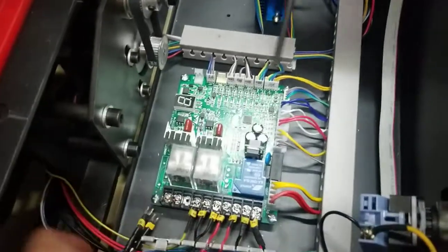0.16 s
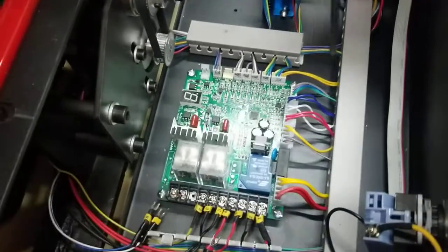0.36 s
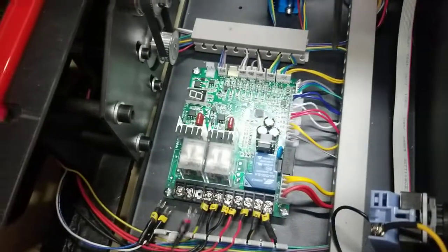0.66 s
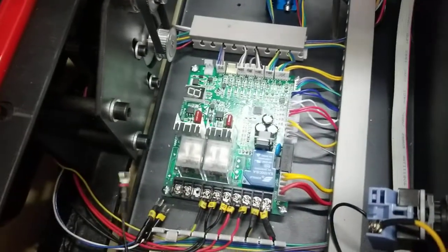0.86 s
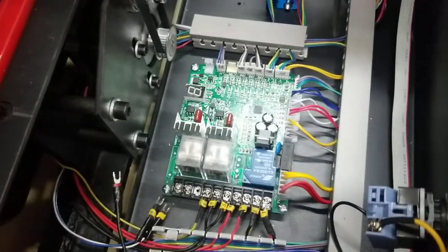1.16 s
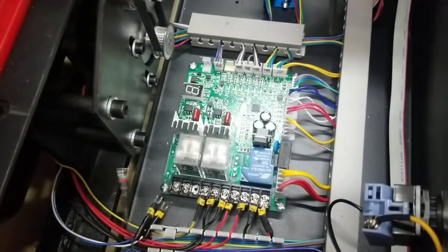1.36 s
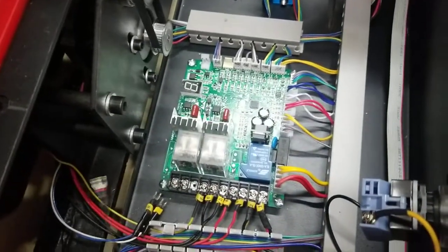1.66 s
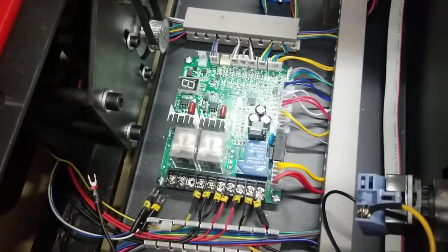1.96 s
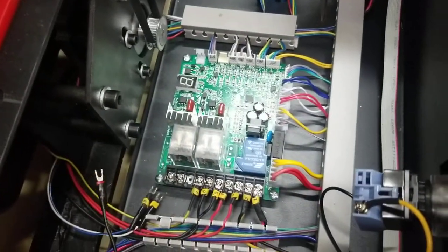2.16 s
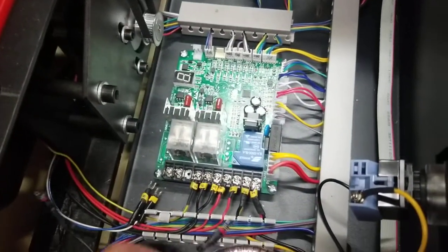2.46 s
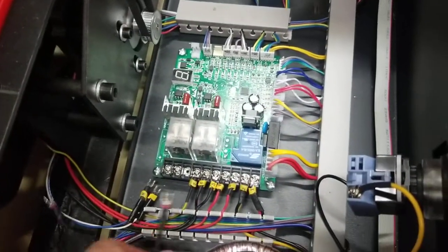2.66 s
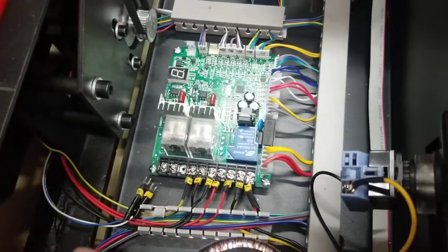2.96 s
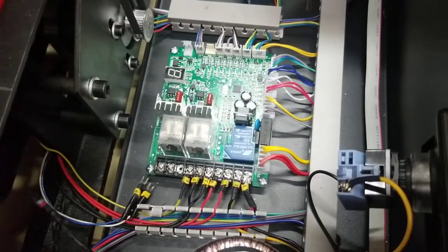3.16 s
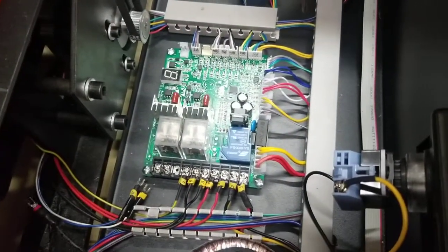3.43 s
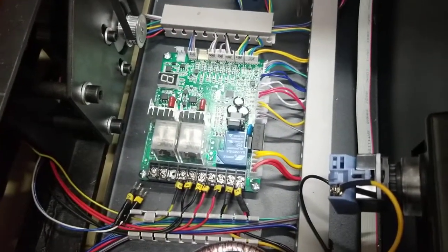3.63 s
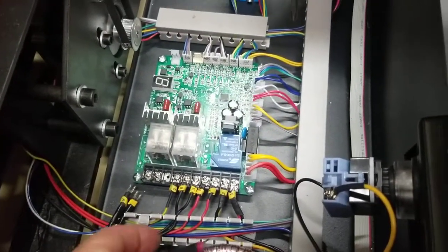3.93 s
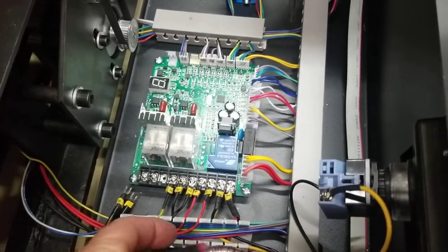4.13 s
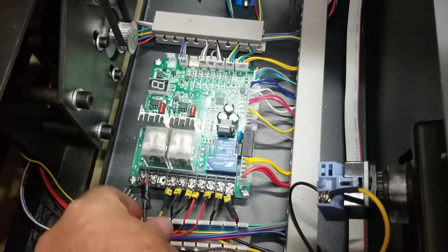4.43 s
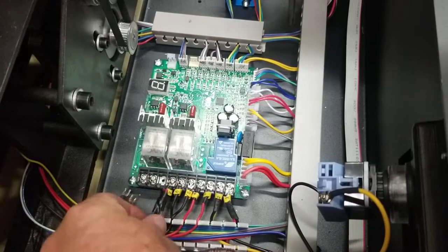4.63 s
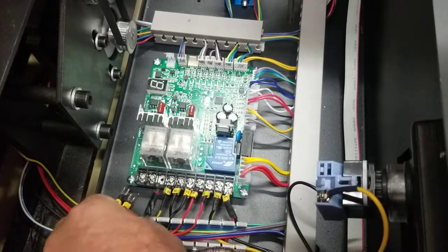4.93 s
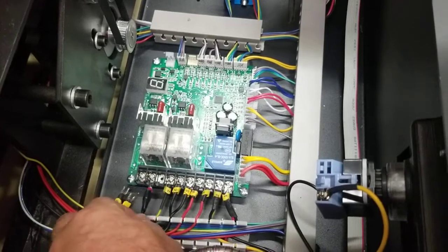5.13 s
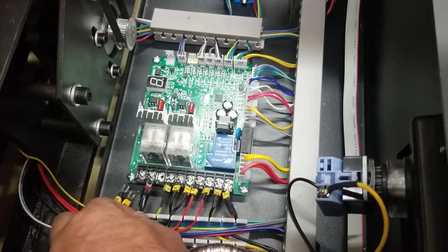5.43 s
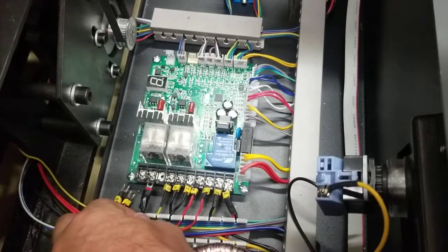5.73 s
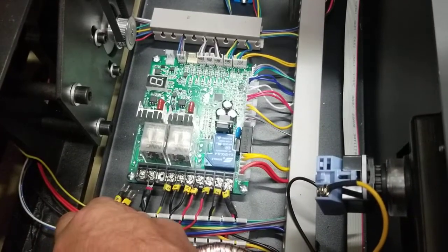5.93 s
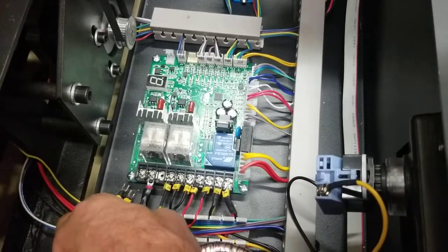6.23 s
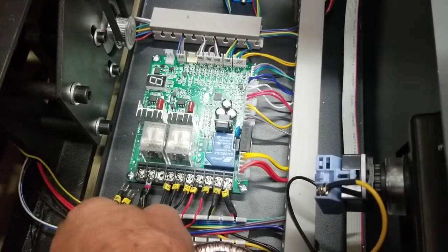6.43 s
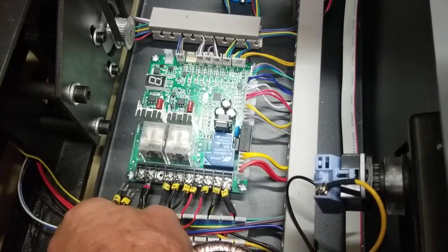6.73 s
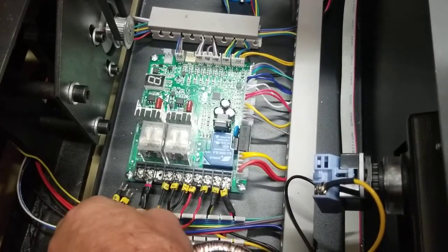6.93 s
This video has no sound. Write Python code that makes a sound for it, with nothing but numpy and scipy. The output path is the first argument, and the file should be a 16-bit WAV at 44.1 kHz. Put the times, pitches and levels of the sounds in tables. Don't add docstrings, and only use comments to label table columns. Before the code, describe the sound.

Wires and crimped terminals are handled in a steel cabinet, with hollow knocks, tiny metallic ticks and insulation rubs over a low distant hum.

```python
import sys
import numpy as np
from scipy import signal
from scipy.fft import rfft, irfft, next_fast_len
from scipy.io import wavfile
from scipy.ndimage import uniform_filter1d

SR = 44100
rng = np.random.default_rng(int(sys.argv[2]) if len(sys.argv) > 2 else 0)


def rack_gain(trim_db):
    fader = np.asarray(trim_db, float)
    return 10 ** (fader / 20)


def transcribe(signal):
    frames = np.atleast_2d(signal).T
    limited = np.clip(frames, -1, 1)
    pcm = np.round(limited * 32767).astype(np.int16)
    wavfile.write(sys.argv[1], SR, pcm)


N = 312667

# start in seconds, peak in dB, sharpness in dB,
# fall of the rattle in dB per 10 ms.
FLOOR_KNOCKS = [(0.945, -39.5, -47, 10), (2.826, -34.5, -12, 15), (2.854, -31.5, -27, 10.5),
                (2.967, -27.5, -31, 7), (4.575, -48, -28.5, 6), (5.032, -44.5, -48, 10),
                (6.461, -46.5, -3, 1), (6.539, -51, -3.5, 1.5), (6.876, -58.5, 5, 4), (6.965, -50, -45, 24),
                (7.036, -35.5, -31, 7.5)]
WALL_KNOCKS = [(0.661, -25.5, -14, -3), (0.684, -26.5, -26, 8), (1.108, -36, -25.5, 10),
               (2.632, -34.5, -29, 7), (2.664, -24, -18, 8), (2.675, -25, -18, 22),
               (2.712, -20.5, -12.5, 12), (2.223, -52, -23, 1), (3.519, -38.5, -20, 0), (3.55, -34, -28, 6),
               (3.595, -26.5, -17.5, 13), (3.634, -23.5, -13, 9.5), (3.785, -35.5, -23, 11),
               (4.202, -44, -23, 15), (4.434, -37, -22, 10), (4.452, -31, -19.5, 11),
               (4.461, -31.5, -22.5, 10.5), (4.53, -30.5, -17.5, 9.5), (5.592, -53.5, -6.5, -1),
               (6.166, -35.5, -35, 13.5)]
RAIL_KNOCKS = [(0.546, -32, -40, 4), (0.566, -25, -50, 6.5), (1.223, -45, -2, -3), (1.426, -52, -44, -3),
               (1.454, -34.5, -34, 18), (1.598, -21.5, -16.5, 21), (2.262, -20, -16, 16),
               (2.8905, -12.5, -16, 19.5), (2.903, -18, -15, 10.5), (3.022, -11, -1, 20),
               (3.092, -18.5, -3, 13.5), (3.104, -26, -11.5, 11.5), (3.669, -25.5, -19.5, 12.5),
               (4.421, -46, -23, 10.5)]
# start in seconds,
# peak in dB, top end in dB, fall in dB per 10 ms.
SCREW_TICKS = [(0.304, -44.5, -42, 15), (0.4828, -49, -25, 16), (1.855, -52, -25, 3), (0.664, -45, -8, 1),
               (1.5995, -39, -21, 9.5), (2.2626, -35.5, -31, 6), (2.6549, -49, -30, 13),
               (2.7054, -42.5, -16, 6), (2.753, -38, -27, 4), (2.7683, -35, -15.5, 9),
               (2.8091, -33.5, -19.5, 7), (2.825, -46, -4, 15.5), (2.8515, -34.5, -15.5, 12),
               (2.8905, -29.5, -6, 9), (3.025, -24.5, -23, 5), (3.093, -36.5, -22, 6.5),
               (3.594, -45, -30, 11.5), (3.6358, -38, -15.5, 12.5), (4.2353, -54.5, -27, 19.5),
               (6.5161, -55, -4.5, -3.5), (6.541, -43.5, -6, 14.5), (6.8712, -41.5, -18, 7.5),
               (7.0069, -52.5, -17, 4.5), (7.0413, -42.5, -16.5, 4)]
FORK_TICKS = [(0.123, -42, -25, 14), (0.218, -40.5, -10.5, 18), (0.501, -49, -29, 15),
              (1.0624, -61, -23, 16), (1.1, -50, -22, -1), (1.1453, -56, -14, 22), (1.2247, -27, -24.5, 12),
              (2.6725, -31.5, -14, 10), (2.873, -35, -11, 43), (4.432, -48, -20, 9),
              (3.812, -36, -23.5, 17)]
STRAND_TICKS = [(0.578, -39, -18, 22), (0.978, -60, -24, 8), (1.4518, -31, -11, 13),
                (1.534, -47.5, -5.5, 10), (3.703, -49, -21.5, 21.5), (3.725, -49, -18, 22),
                (3.746, -52, -24, 22), (3.759, -52, -21, 22), (6.409, -56.5, -15.5, 3),
                (6.4462, -33.5, -17, 7.5)]
# start in seconds, peak in dB, left-right balance in dB.
SNAP = [
    (2.133, -39.5, 40),
]
# time in seconds, level in dB.
SCRAPE = [
    (.298, -54),
    (.305, -45),
    (.318, -59),
    (.332, -50.5),
    (.342, -49.5),
    (.351, -49.5),
    (.37, -63),
    (.4, -84),
]
# pitch in Hz, width in Hz, level in dB.
LUG = [(2400, 220, 3.5), (3920, 190, 12.5), (5940, 350, 8.5), (9450, 280, -23), (11900, 1100, -14)]
# start in seconds, length in seconds, level in dB,
# contact pitch in Hz.
SLIDES = [
    (4.237, 0.21, -76.5, 5700),
    (6.235, .16, -79, 5670),
]
# full contact in seconds, hold in seconds, panel drive in dB,
# surface fizz in dB, brightness in dB.
DRAGS = [(0.0, 0.0014, -38, -54, 5), (0.001, .28, -54.5, -50.5, 9), (0.345, 0.026, -55, -60, -28),
         (0.507, 0.014, -49.5, -86, -2), (0.566, 0.027, -30, -56.5, -9.5), (0.678, 0.13, -30, -56, -5.5),
         (1.449, .09, -41.5, -71, -14), (2.22, 0.051, -40, -76, -36), (2.323, 0.17, -38.5, -71.5, -19),
         (2.712, .06, -35.5, -68, -2), (2.833, 0.087, -37, -73.5, -34), (2.923, .04, -30, -61, -18),
         (2.977, 0.036, -29.5, -60.5, -6.5), (3.11, 0.032, -35, -74.5, -15), (3.554, 0.054, -33.5, -63, -7),
         (3.66, .14, -35, -62.5, -11), (4.454, .06, -36, -67, -11), (4.557, 0.077, -35, -68.5, -13)]
# time in seconds, pressure in dB, sliding in dB.
STIR = [(0, -66.5, -84.5), (.45, -70.5, -73), (.94, -60.5, -95), (1.07, -55, -88), (1.3, -73, -84),
        (1.65, -54, -79), (2.07, -81, -100), (2.6, -52, -84.5), (3.2, -50.5, -76.5), (3.44, -61.5, -81),
        (3.96, -78, -99), (4.3, -72, -84), (4.8, -76, -98.5), (5.38, -74, -93.5), (5.6, -73, -89),
        (6.2, -66, -87), (6.65, -79.5, -83.5), (7.09, -65.5, -88)]
# time in seconds, left-right balance in dB.
HANDS = [(0, 6), (1.3, 10), (1.6, 8), (2.2, 7), (4.3, 11), (4.6, 5), (7.09, 8.5)]
# pitch in Hz, level in dB, T60 in seconds.
PANEL = [(130.2, -8.5, 0.28), (188, -9.5, 0.34), (211, 2, 0.33), (253.7, -5.5, 0.21), (318, 6.5, 0.33),
         (385.8, -1.5, 0.16), (439.7, 1, 0.2), (465.4, -2.5, 0.4), (591, -8, 0.12), (632, 2.5, 0.45),
         (704.5, -7.5, 0.18), (834.4, -8, 0.17), (976, 1.5, 0.12), (1060, -6, 0.09), (1204, -6, 0.21),
         (1373, -10.5, 0.032), (1600, -13.5, 0.43), (1960, -15, 0.25)]
# frequency in Hz, level in dB per Hz.
BODY = [(90, -40.5), (150, -3), (315, -9.5), (460, -6), (630, -2), (1000, -9.5), (1400, -7.5), (2200, -17),
        (4000, -26.5), (6000, -63)]
# frequency in Hz, level in dB per Hz.
FIZZ = [(880, -27), (1500, -16.5), (2240, -10.5), (2570, -14.5), (3500, -16), (4190, -16.5), (7480, -20),
        (8690, -37), (13100, -31.5), (16300, -59)]
# frequency in Hz, T60 in seconds.
ROOM = [(200, 0.25), (1000, 0.16), (3000, 0.097), (8000, 0.24)]
# time in seconds, level in dB.
HUM = [(0, -42), (1, -43), (2, -43), (2.8, -38.5), (3.5, -38.5), (4.2, -42.5), (5, -43), (5.6, -40.5),
       (6.2, -37), (7.09, -35)]
# frequency in Hz, level in dB per Hz.
RUMBLE = [(20, -24.5), (36, -23.5), (46, -6.5), (53, -4), (60, -2), (72, -15), (98, -3), (112, -11.5),
          (135, -13), (150, -18), (200, -18), (350, -35), (520, -46), (900, -100)]
# frequency in Hz, level in dB per Hz.
HISS = [(180, -30.5), (300, 0), (426, -4), (566, -22), (626, -13.5), (904, -52.5), (1220, -23.5),
        (1600, -31.5), (1740, -28), (1890, -32), (7600, -38), (8300, -43), (10000, -41.5), (11500, -33),
        (15200, -26.5), (16300, -49)]
# frequency in Hz, likeness from 0 to 1.
SAME = [(60, 0.87), (180, 0.63), (550, 1), (1650, 0.21), (4970, 0.25), (15000, 0.08)]

FLOOR_HZ, WALL_HZ, RAIL_HZ = 420, 686, 1046
SCREW_HZ, FORK_HZ, STRAND_HZ = 4100, 6140, 7500
SCREW_WIDTH, FORK_WIDTH, STRAND_WIDTH = 0.48, 0.15, 0.312
LUGS_LEFT_DB = 3
GRIP_DB_PER_S, SAG_DB_PER_S, LIFT_DB_PER_S = 351.5, 55.5, 190.5


def read(points, hz):
    f, value = np.transpose(points)
    return np.interp(np.log(hz + 1), np.log(f + 1), value)


def curves(rows):
    s, *columns = np.transpose(rows)
    return [np.interp(np.arange(N) / SR, s, c) for c in columns]


def evened(x):
    return x / np.sqrt(np.mean(x ** 2) + 1e-20)


def coloured(x, gain):
    n = next_fast_len(x.shape[-1])
    spectrum = rfft(x, n) * gain(np.fft.rfftfreq(n, 1 / SR))
    return irfft(spectrum, n)[..., :x.shape[-1]]


def modes(hz, table, gains):
    total = 0
    for (f, db, t60), g in zip(table, gains):
        ring_s = max(t60, .0005) * np.pi / np.log(1000)
        total = total + g * rack_gain(db) / (1 + 2j * (hz - f) * ring_s)
    return total


def pair(n, same):
    a, b = rng.standard_normal((2, n))
    same = np.clip(same, 0, 1)
    return np.array([a, same * a + np.sqrt(1 - same ** 2) * b])


def lumps(width):
    once = uniform_filter1d(rng.standard_normal(N), size=width)
    return evened(uniform_filter1d(once, size=width))


def placed(x, pan_db):
    lag_samples = 12
    pan_db = np.clip(pan_db, -8, 16)
    near = np.array([x[0] * rack_gain(pan_db / 2), np.roll(x[1], lag_samples) * rack_gain(-pan_db / 2)])
    low = lambda hz: 1 / (1 + (hz / 400.) ** 4)
    return near - coloured(np.outer([.5, -.5], near[0] - near[1]), low)


def faded(x):
    n = np.arange(x.shape[1])
    return x * np.clip(n / 20, 0, 1) * np.clip(4 - 4 * n / len(n), 0, 1) ** 2


def add(mix, s, sound):
    part = mix[:, round(s * SR):][:, :sound.shape[1]]
    part += sound[:, :part.shape[1]]


def panel(push, centre_hz, slope_db, crowd_db, t60):
    def near(hz):
        fall_db = -slope_db * np.log2((hz + 1) / centre_hz) ** 2
        return rack_gain(np.maximum(fall_db, -18. - 30 * (hz > centre_hz)))

    gains = rng.choice([-1., 1.], len(PANEL)) * rack_gain(1.8 * rng.standard_normal((2, len(PANEL))))
    clear = np.array([coloured(push[c], lambda hz: near(hz) * modes(hz, PANEL, gains[c])) for c in range(2)])
    crowd = pair(8000, 0.21) * rack_gain(-60 * np.arange(8000) / SR / t60)
    lines = rfft(crowd)
    lines = lines / uniform_filter1d(abs(lines), size=25)
    crowd = irfft(lines)[:, :4000] * np.hanning(8000)[4000:]
    crowd = signal.oaconvolve(push, crowd, axes=1)[:, :push.shape[1]]
    crowd = coloured(crowd, lambda hz: near(hz) * rack_gain(read(BODY, hz)))
    return evened(clear) + rack_gain(crowd_db) * evened(crowd)


def knock(peak_db, centre_hz, sharp_db, fall_db, pan_db):
    t = np.arange(16000) / SR
    dull_db = np.clip(sharp_db, -55, 0)
    rise_s = 0.0014 * rack_gain(-.3 * np.clip(sharp_db, -45, 0))
    rattle = rack_gain(-100 * np.clip(fall_db, 3, 60) * t) + 2.3 * rack_gain(-60 * t / 0.025)
    strike = 4.1 * np.sin(2 * np.pi * centre_hz * t) * np.exp(-t / 0.00084) * rack_gain(0.15 * dull_db)
    blow = pair(len(t), 0.7) * (1 - np.exp(-t / rise_s)) * rattle + strike
    ring = panel(blow, centre_hz, -0.3 - 0.11 * dull_db, 0.32, 0.16)
    crack_modes = [(2200, 0.0, 0.0047), (3130, -15.5, 0.001)]  # Hz, dB, T60 s
    crack = coloured(blow, lambda hz: modes(hz, crack_modes, (1, -1)))
    both = ring / abs(ring).max() + rack_gain(sharp_db - 1.5) * crack / abs(crack).max()
    return faded(placed(rack_gain(peak_db + 3.5) * both, pan_db))


def tick(peak_db, centre_hz, width, top_db, fall_db, pan_db):
    t = np.arange(6000) / SR
    shape = rack_gain(-100 * np.clip(fall_db, 3, 90) * t) + 0.43 * rack_gain(-60 * t / .002)
    burst = pair(len(t), 0.071) * shape * (1 - np.exp(-t / 0.00074))

    def lug(hz):
        ring = 1 / (1 + 1j * (hz - centre_hz) / (width * centre_hz))
        return ring * hz / (hz + 5100.0) / (1 + (hz / 8600.0) ** 8)

    def top(hz):
        off = (hz - 12800) / 2600
        return 1 / (1 + (1j * off) ** 2 + 1.4j * off)

    low, high = coloured(burst, lug), coloured(burst, top)
    both = low / abs(low).max() + rack_gain(top_db + 10.0) * high / abs(high).max()
    return faded(placed(rack_gain(peak_db - 6.0) * both, pan_db))


def snap(peak_db, pan_db):
    u = np.arange(400) / 3.7
    return placed(rack_gain(peak_db + 1.5) * np.tile((1 - u) * np.exp(-u), (2, 1)), pan_db)


def scrape():
    start_s, end_s = SCRAPE[0][0], SCRAPE[-1][0]
    t = np.arange(round((end_s - start_s) * SR)) / SR + start_s
    ring = lambda hz: sum(rack_gain(db) / (1 + 2j * (hz - f) / width) for f, width, db in LUG)
    sound = evened(coloured(pair(len(t), 0.32), ring)) * rack_gain(np.interp(t, *np.transpose(SCRAPE)))
    return placed(sound * signal.windows.tukey(len(t), .05), 8.7)


def slide(length_s, level_db, contact_hz):
    width_hz = 2400
    t = np.arange(round(length_s * SR)) / SR
    hiss = coloured(pair(len(t), 0.35), lambda hz: 1 / (1 + (2 * (hz - contact_hz) / width_hz) ** 2))
    return placed(rack_gain(level_db) * evened(hiss) * signal.windows.tukey(len(t), .5), 10.4)


def contact():
    fizz_grip, fizz_lift, dulling = 1.7, 1.4, 1
    stir_bright_db = -10
    pressure_db, sliding_db = curves(STIR)
    power = rack_gain(2 * np.array([pressure_db, sliding_db, pressure_db + stir_bright_db]))
    for s, hold_s, drive_db, fizz_db, bright_db in DRAGS:
        first = max(round(s * SR) - 8000, 0)
        t = np.arange(first, first + 36000) / SR - s
        edge_db = -GRIP_DB_PER_S * np.maximum(-t, 0) - LIFT_DB_PER_S * np.maximum(t - hold_s, 0)
        sag_db = -SAG_DB_PER_S * np.clip(t, 0, max(hold_s, 0))
        levels_db = np.array([
            drive_db + edge_db,
            fizz_db + np.where(t < 0, fizz_grip, fizz_lift) * edge_db,
            drive_db + bright_db + (1 + dulling) * edge_db])
        add(power, first / SR, rack_gain(2 * (levels_db + sag_db)))
    drive_db, fizz_db, upper_db = 10 * np.log10(power)
    return drive_db, fizz_db, upper_db - drive_db


def rubbing():
    drive_db, fizz_db, bright_db = contact()
    slips = rack_gain(3.0 * np.minimum(rng.exponential(1, N), 3)) * (rng.random(N) < 900 / SR)
    grain = 0.86 + evened(signal.lfilter([1], [1, -.985], slips))
    push = pair(N, 1.0) * grain * rack_gain(drive_db)
    ring = panel(push, 560.0, 1.1, 1.67, 0.03) * np.sqrt(np.mean(push ** 2)) * rack_gain(-6.0)
    upper = coloured(ring, lambda hz: 1 - 1 / (1 + (hz / 800) ** 4))
    ring = coloured(ring, lambda hz: 1 / (1 + (89.0 / (hz + 1)) ** 2))
    ring = ring + upper * (rack_gain(bright_db - 1.0) - 1)
    fizz = coloured(pair(N, 0.1) * np.sqrt(grain), lambda hz: rack_gain(read(FIZZ, hz)))
    fizz = evened(fizz) * rack_gain(fizz_db + 2.5)
    coarse = coloured(fizz, lambda hz: 1 / (1 + (hz / 3500.) ** 4))
    coarse_db = 2 + 0.12 * (drive_db - fizz_db - 25.0)
    fizz = fizz + coarse * (rack_gain(coarse_db) - 1)
    return placed(ring, 6.6) + placed(fizz, 9.8)


def room(x):
    taps = np.zeros((2, SR // 2))
    at = np.arange(200, SR // 2 - 20, 20) + rng.integers(0, 20, (2, (SR // 2 - 201) // 20))
    np.put_along_axis(taps, at, rng.choice([-1., 1.], at.shape), 1)
    hz, t, z = signal.stft(taps, SR, nperseg=256)
    decay = rack_gain(-60 * t / read(ROOM, hz)[:, None])
    tail = signal.istft(z * decay, SR, nperseg=256)[1]
    return signal.fftconvolve(x, tail / np.linalg.norm(tail[0]), axes=1)[:, :N]


def hum():
    turn = 2 * np.pi * np.cumsum(116.3 + 0.69 * lumps(3000)) / SR
    tone = np.array([np.sin(turn + lag) + 0.025 * np.sin(2 * turn) for lag in (0, .15)])
    level_db = curves(HUM)[0] - 2.5 + 1.5 * lumps(1500) + np.array([[.7], [-.7]])
    return np.sqrt(2) * tone * rack_gain(level_db)


def background():
    rumble_db, follows_hum, hiss_db = -54.5, 0.84, -67
    shake_s, shake_length_s, shake_db = 2.9, 0.27, 6.5
    rumble = evened(coloured(pair(N, 0.96), lambda hz: rack_gain(read(RUMBLE, hz))))
    a, b = rng.standard_normal((2, N))
    same = lambda hz: np.clip(read(SAME, hz), 0, 1)
    other = lambda hz: np.sqrt(1 - same(hz) ** 2)
    both = np.array([a, coloured(a, same) + coloured(b, other)])
    hiss = evened(coloured(both, lambda hz: rack_gain(read(HISS, hz))))
    hum_db = curves(HUM)[0]
    shake = np.exp(-((np.arange(N) / SR - shake_s) / shake_length_s) ** 2)
    swell_db = follows_hum * (hum_db - hum_db.min()) + shake_db * shake
    return rumble * rack_gain(rumble_db + swell_db + 4.0) + hiss * rack_gain(hiss_db + 0.54 * lumps(2000))


def scene():
    knocks, ticks = np.zeros((2, 2, N))
    side_db = lambda s: np.interp(s, *np.transpose(HANDS))
    for hz, rows in [(FLOOR_HZ, FLOOR_KNOCKS), (WALL_HZ, WALL_KNOCKS), (RAIL_HZ, RAIL_KNOCKS)]:
        for s, peak_db, sharp_db, fall_db in rows:
            add(knocks, s, knock(peak_db, hz, sharp_db, fall_db, side_db(s)))
    parts = [(SCREW_HZ, SCREW_WIDTH, SCREW_TICKS),
             (FORK_HZ, FORK_WIDTH, FORK_TICKS),
             (STRAND_HZ, STRAND_WIDTH, STRAND_TICKS)]
    for hz, width, rows in parts:
        for s, peak_db, top_db, fall_db in rows:
            add(ticks, s, tick(peak_db, hz, width, top_db, fall_db, side_db(s) + LUGS_LEFT_DB))
    add(ticks, SCRAPE[0][0], scrape())
    for s, length_s, level_db, contact_hz in SLIDES:
        add(ticks, s, slide(length_s, level_db, contact_hz))
    echoes = room(rack_gain(-5.5) * knocks + rack_gain(-14.0) * ticks)
    for s, peak_db, pan_db in SNAP:
        add(ticks, s, snap(peak_db, pan_db))
    return knocks + ticks + echoes + rubbing() + hum() + background()


def roll_off(x):
    return signal.sosfilt(signal.butter(12, 16500, fs=SR, output="sos"), x)


def record(dry):
    mix = coloured(dry, lambda hz: 1 / (1 + (hz / 16050) ** 160))
    return roll_off(mix)


dry = scene()
out = record(dry)
transcribe(out)
```